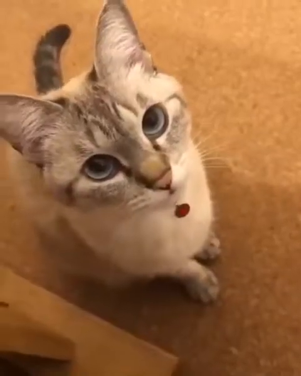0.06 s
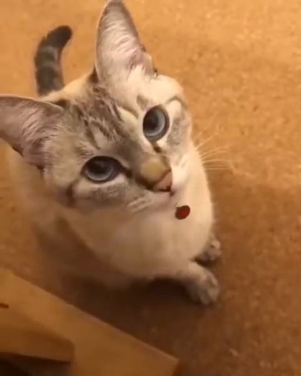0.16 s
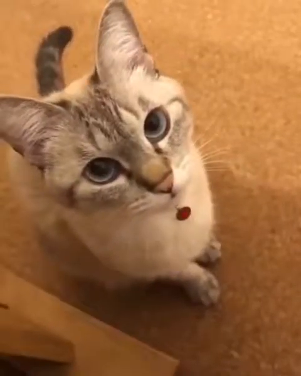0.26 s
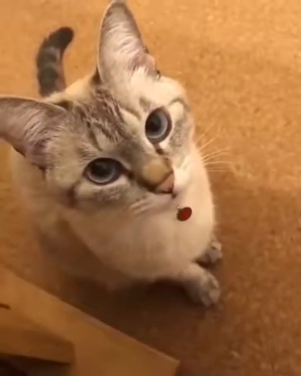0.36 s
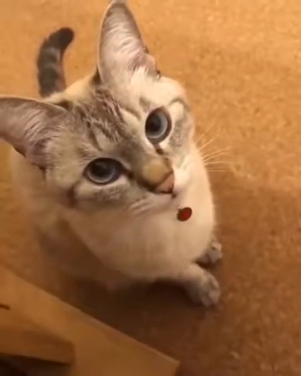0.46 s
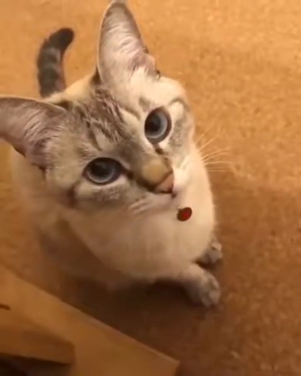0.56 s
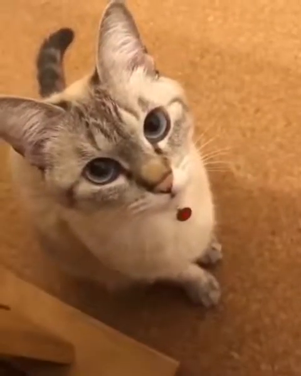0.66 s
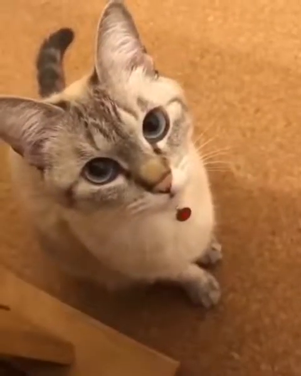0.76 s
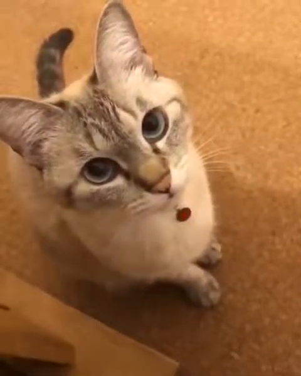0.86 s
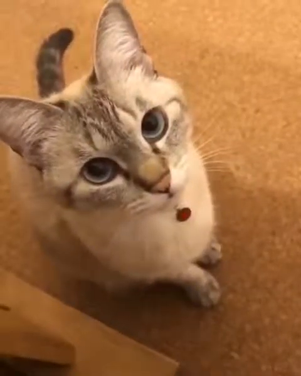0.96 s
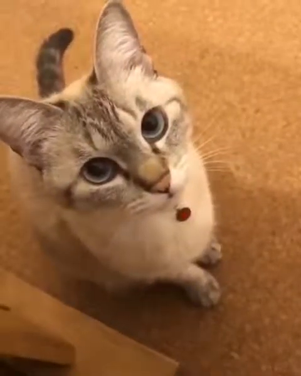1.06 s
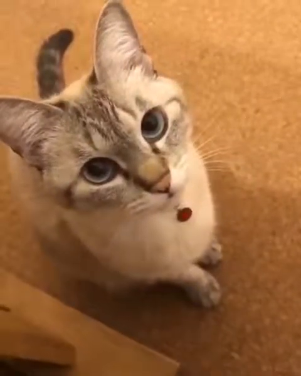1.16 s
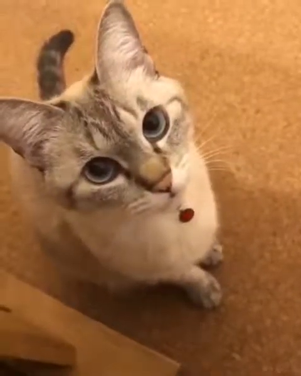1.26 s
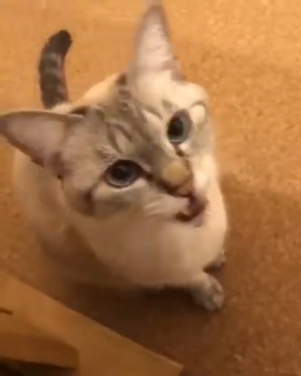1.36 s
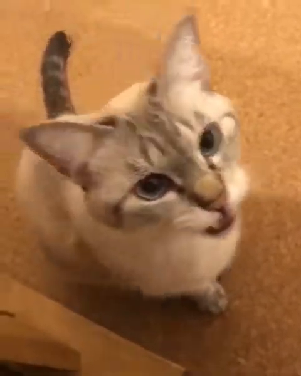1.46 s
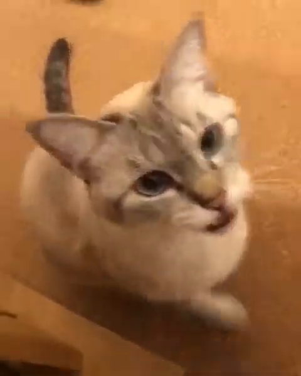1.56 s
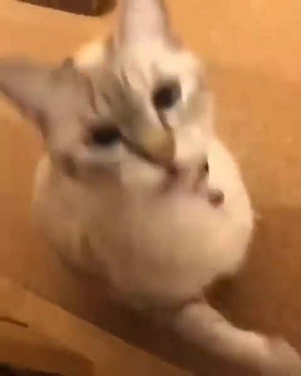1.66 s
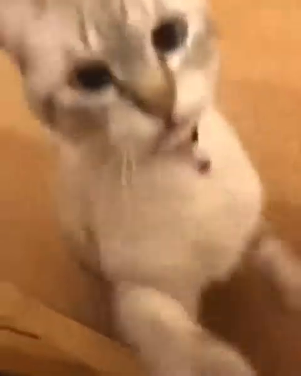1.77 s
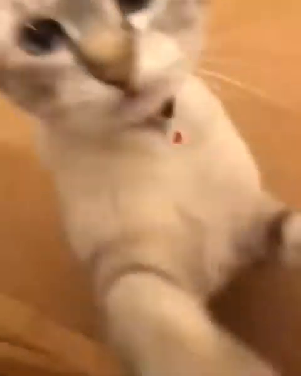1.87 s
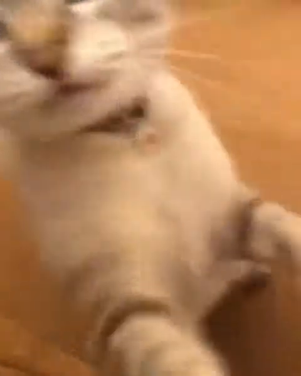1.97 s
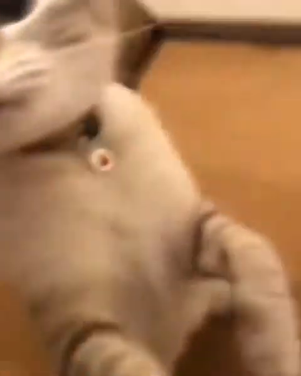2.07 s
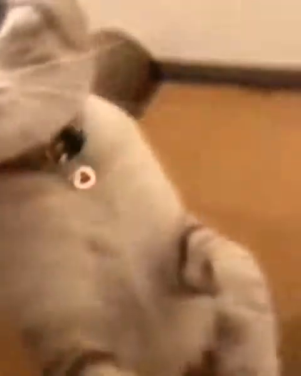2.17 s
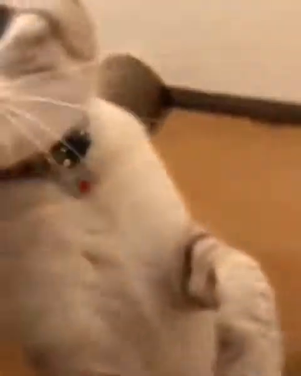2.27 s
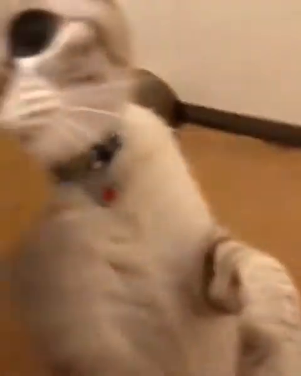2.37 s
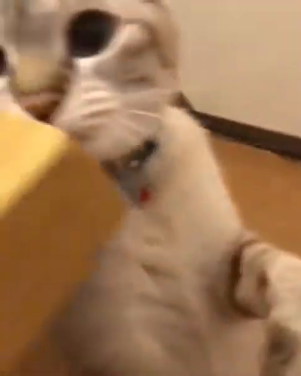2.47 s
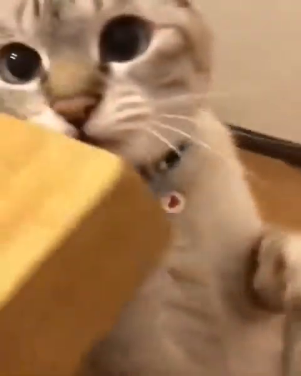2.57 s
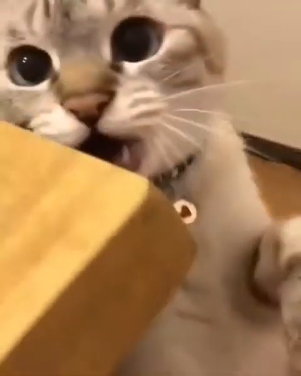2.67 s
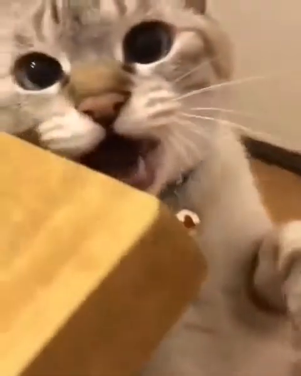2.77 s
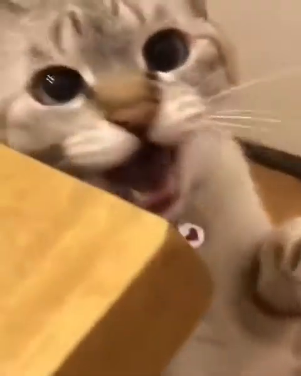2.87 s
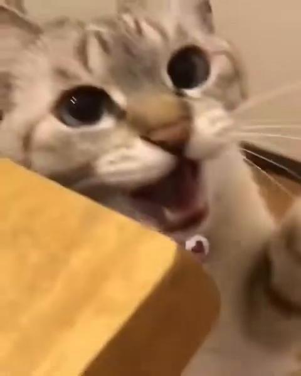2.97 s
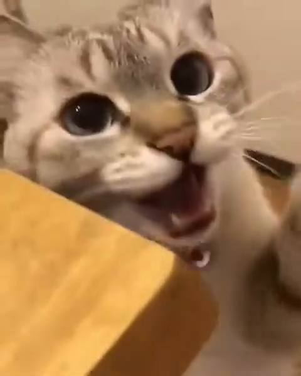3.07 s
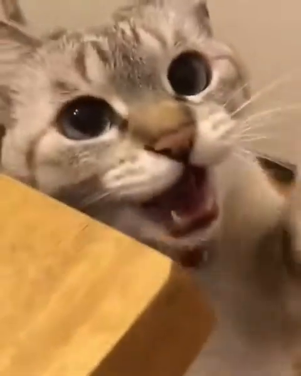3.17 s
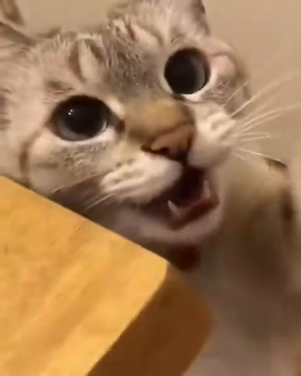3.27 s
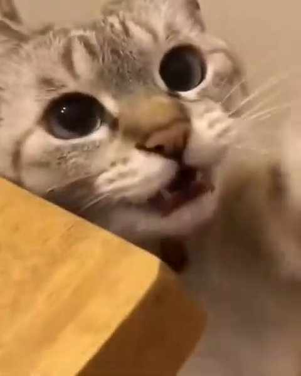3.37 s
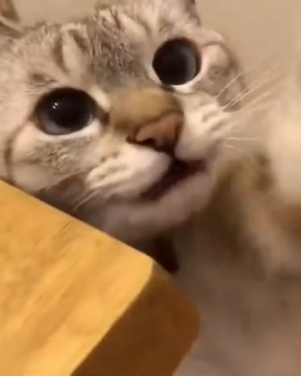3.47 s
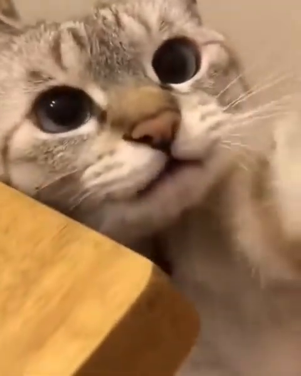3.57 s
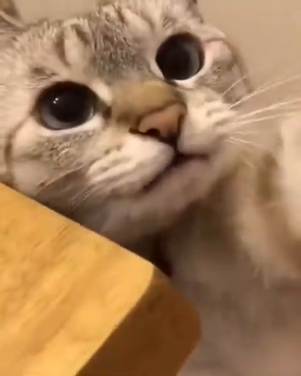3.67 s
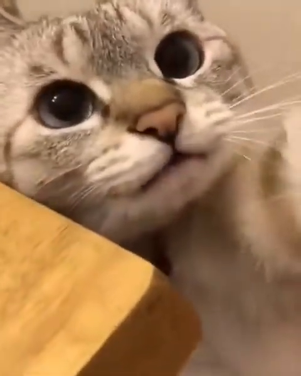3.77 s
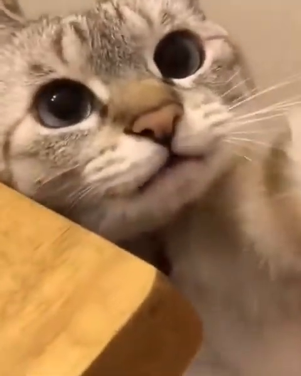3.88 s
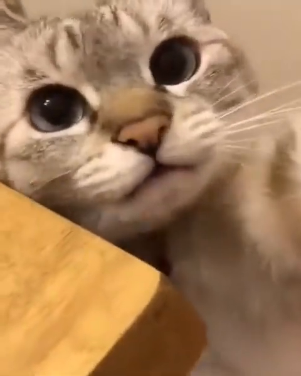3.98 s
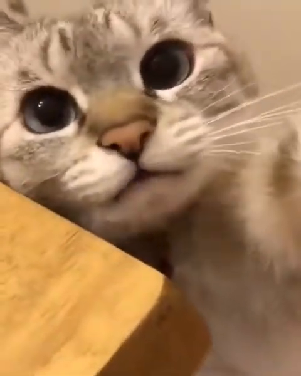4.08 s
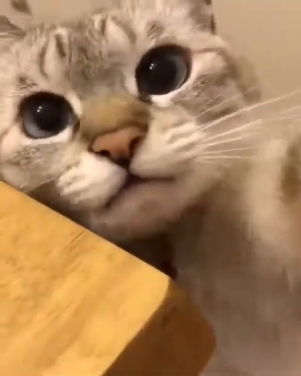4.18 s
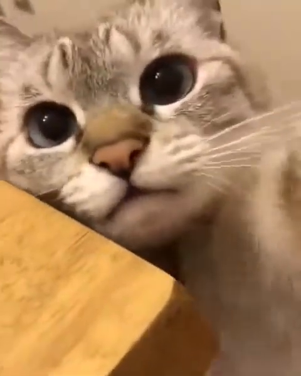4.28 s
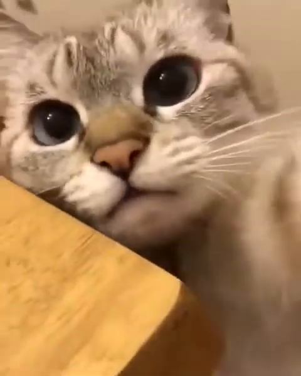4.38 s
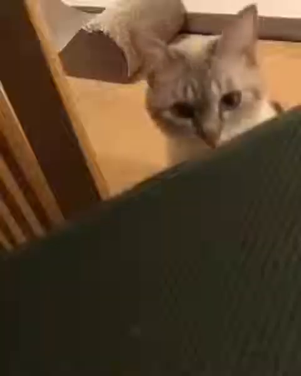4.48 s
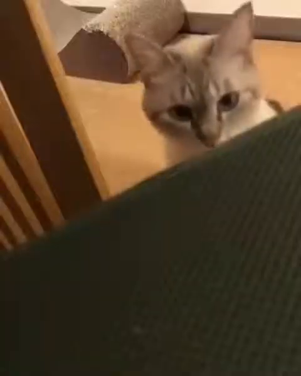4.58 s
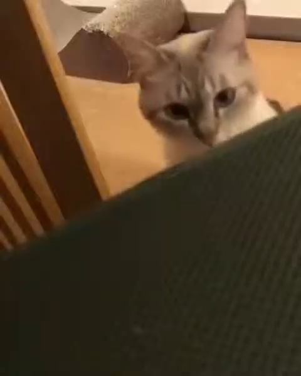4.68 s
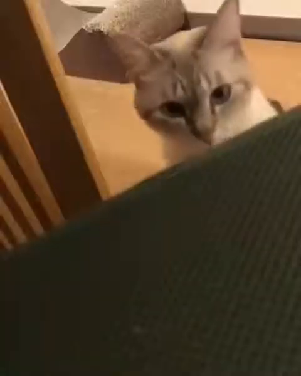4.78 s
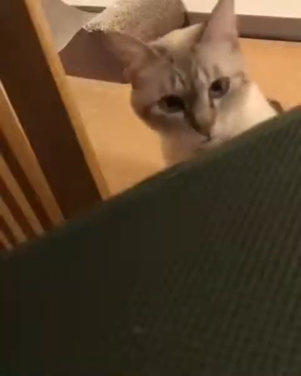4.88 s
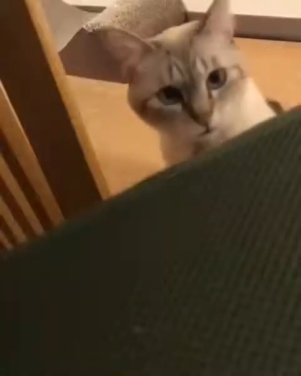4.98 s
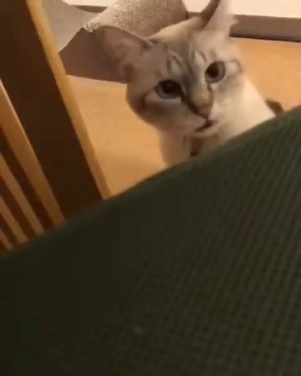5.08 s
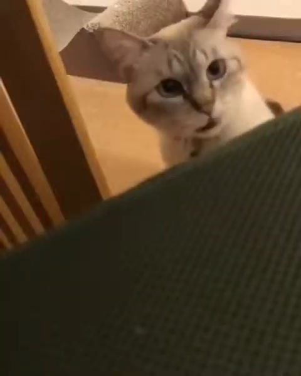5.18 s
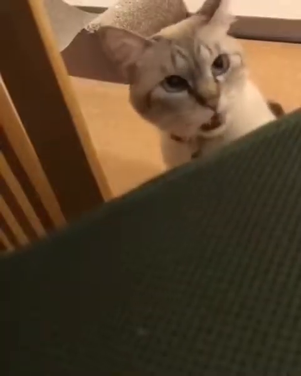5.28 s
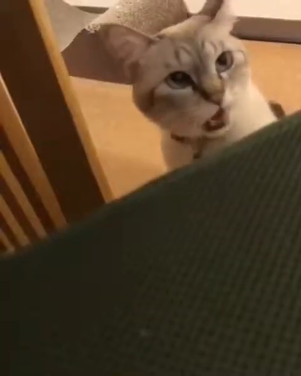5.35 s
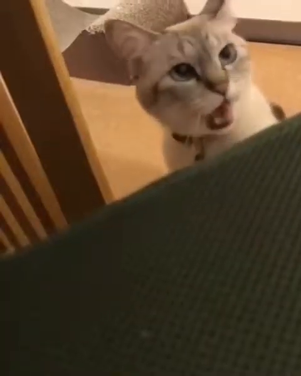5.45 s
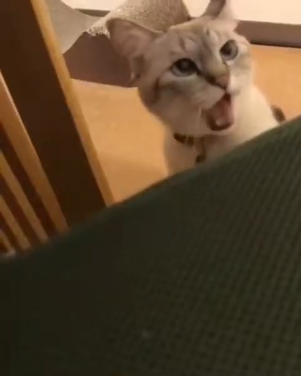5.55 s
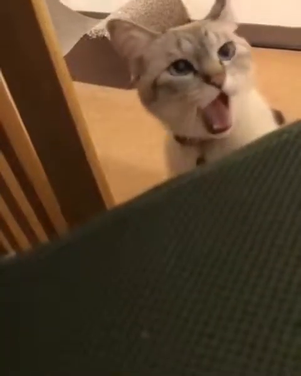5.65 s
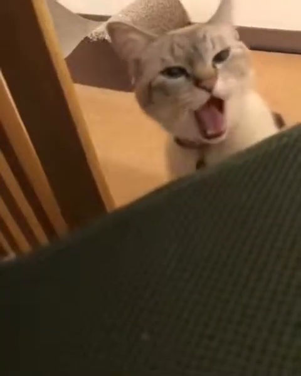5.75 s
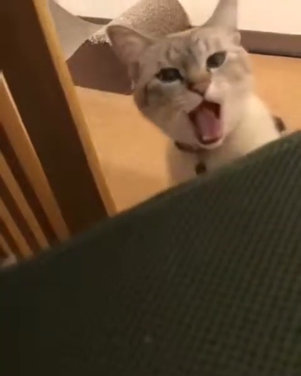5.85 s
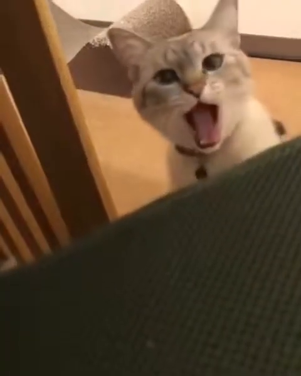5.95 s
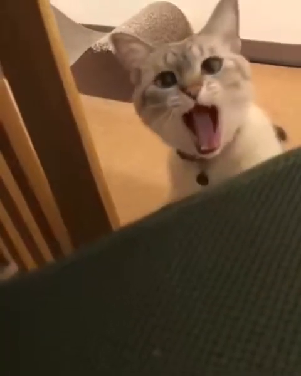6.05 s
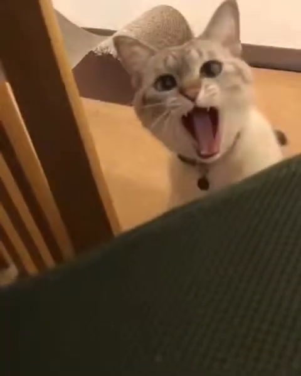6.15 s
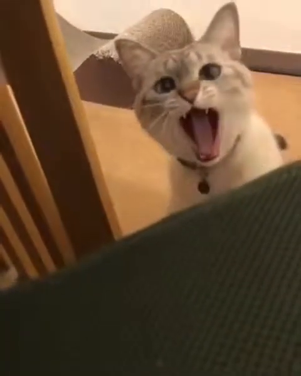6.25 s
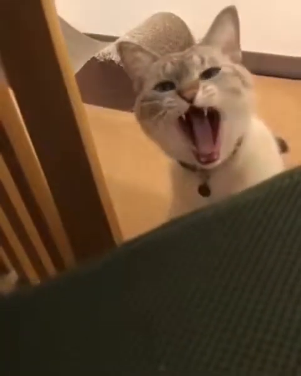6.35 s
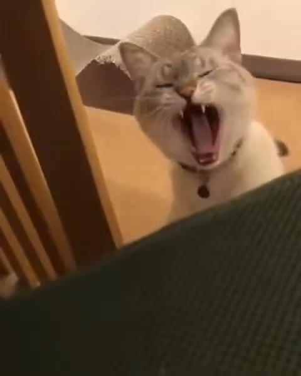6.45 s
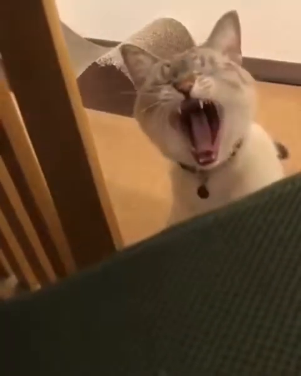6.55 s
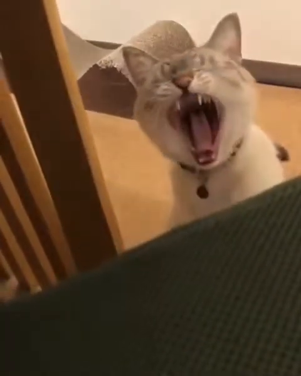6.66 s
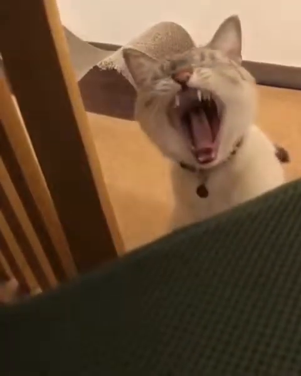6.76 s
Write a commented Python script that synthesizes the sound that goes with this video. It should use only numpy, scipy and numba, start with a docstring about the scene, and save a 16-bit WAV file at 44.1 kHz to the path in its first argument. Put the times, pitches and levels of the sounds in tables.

```python
"""An appliance rumbles in a carpeted room: coloured noise with a throbbing bass and two narrow drones.
A cat meows twice close by: pitched partials shaped by the mouth, with a rasp of air puffs. Between the calls
it rears up against a table: claws, paws and lips are short noise bursts, fur is patchy noise.
After a short silence a quieter room has a mains hum, a wavering sine under noise. The collar tag tinkles
once in two narrow bands, then the cat gives a long falling meow that widens into a yawn."""
import sys
import numpy as np
from scipy import signal
from scipy.fft import rfft, irfft
from scipy.io import wavfile
from scipy.ndimage import uniform_filter1d
from numba import njit

SR = 44100
rng = np.random.default_rng(int(sys.argv[2]) if len(sys.argv) > 2 else 0)


def to_wav(s):
    """Save 16-bit WAV."""
    ch = np.atleast_2d(s).T  # columns
    pcm = np.round(np.clip(ch, -1, 1) * 32767)  # PCM
    wavfile.write(sys.argv[1], SR, pcm.astype(np.int16))


def natural_amplitude(level_db):
    """Convert a level in decibels to a linear amplitude factor, elementwise."""
    exponent = np.asarray(level_db, float) / 20
    return 10 ** exponent


N = 300762  # samples


def curve(table):
    """Columns of a (seconds, ..) table, drawn as straight lines with one value a sample."""
    seconds, *columns = np.transpose(table)
    return [np.interp(np.arange(N) / SR, seconds, column) for column in columns]


def level(x, db):
    """Scale to an rms level in dB."""
    return x * natural_amplitude(db) / np.sqrt(np.mean(x ** 2))


@njit
def svf(x, hz, width):
    """State-variable band-pass with a moving centre, gain 1 there."""
    y, b, l = np.empty(len(x)), 0., 0.
    for i in range(len(x)):
        g, k = np.tan(np.pi * hz[i] / SR), width / hz[i]
        v = (b + g * (x[i] - l)) / (1 + g * (g + k))
        b, l, y[i] = 2 * v - b, l + 2 * g * v, k * v
    return y


def band(x, hz, width):
    """Band-pass at a fixed or moving centre."""
    return svf(x, hz + np.zeros(len(x)), 1. * width)


def steep(x, hz, width):
    """The band-pass twice, for dark valleys either side."""
    return band(band(x, hz, width), hz, width)


def walk(rate):
    """Random levels held 1 / rate seconds and slewed twice; spread near 1."""
    hold = int(SR / rate)
    steps = np.repeat(rng.standard_normal(N // hold + 1), hold)
    return 1.3 * uniform_filter1d(uniform_filter1d(steps, hold), hold)[:N]


def spell(a, b):
    """One between two times, with soft edges."""
    t = np.arange(N) / SR
    return np.clip(np.minimum(t - a, b - t) / .012, 0, 1)


def room_noise(spectrum, drones, db, throb_db):
    """Coloured noise whose bass throbs, with narrow drones on top."""
    hz, colour_db = np.transpose(spectrum)
    f = np.arange(N // 2 + 1) * SR / N
    colour = natural_amplitude(np.interp(np.log(f + 1), np.log(hz), colour_db))
    noise = rfft(rng.standard_normal(N)) * colour
    bass = irfft(noise * (f < 150), N)
    throbbing = irfft(noise, N) + bass * (natural_amplitude(throb_db * walk(8.0)) - 1)
    tones = sum(level(steep(rng.standard_normal(N), c, w), d) for c, w, d in drones)
    return level(throbbing, db) + tones


# Carpeted room with a rumbling appliance. First part, each row: frequency in Hz, relative density in dB per Hz.
# Second part, each drone: centre in Hz, width of each filter pass in Hz, rms in dB. Last: rms of the noise in dB.
APPLIANCE_ROOM = [(15, -46.5), (25, -28), (64, 0.5), (81, -5), (108, -11.5), (156, -19.5), (270, -15),
                  (325, -19), (400, -16), (445, -17.5), (578, -25.5), (13000, -52.5)], [(273, 14, -74.5),
                  (404.4, 16, -74)], -60


def appliance_room():
    """The rumble throbs strongly in the bass and fades out fast before the silence."""
    t = np.arange(N) / SR
    return np.clip((4.508 - t) / 0.009, 0, 1) * room_noise(*APPLIANCE_ROOM, throb_db=5.0)


# Vocal folds, one table a call. Each row: time in seconds, pitch in Hz, rms of the fundamental in dB.
FOLDS = [
    [(1.442, 560, -59), (1.454, 530, -44.5), (1.478, 544, -43.5), (1.502, 477, -40), (1.53, 502, -43),
     (1.554, 453, -43.5), (1.59, 448, -46.5), (1.618, 454, -48.5), (1.634, 481.5, -47), (1.714, 473, -45.5),
     (1.754, 488.7, -45), (1.806, 474, -48), (1.826, 484.3, -46), (1.858, 479, -49.5), (1.882, 532, -60.5),
     (1.918, 500, -37.5), (1.934, 574, -43.5), (1.974, 505, -46), (1.998, 500, -71)],
    [(2.7, 460, -52), (2.714, 505, -47), (2.754, 511, -43.5), (2.794, 536, -41.5), (2.822, 538, -41.5),
     (2.838, 486, -41.5), (2.89, 543, -41), (2.91, 545, -51), (2.934, 509, -45), (3.01, 517.3, -45.5),
     (3.118, 521, -43.5), (3.218, 514.6, -45), (3.354, 497.5, -46.5), (3.534, 481.4, -46.5),
     (3.614, 475.4, -47.5), (3.655, 485, -47), (3.714, 597, -46), (3.73, 567, -50.5), (3.742, 570, -65)],
    [(5.356, 500, -49.5), (5.368, 458.6, -50.5), (5.416, 456.7, -48), (5.432, 435, -47.5), (5.5, 429, -55),
     (5.518, 440.2, -56.5), (5.652, 443, -52.5), (5.72, 452.8, -50.5), (5.83, 458.3, -50.5),
     (6.0, 449.5, -49.5), (6.148, 440.2, -50), (6.272, 413, -47), (6.328, 403, -45), (6.352, 395.4, -47.5),
     (6.48, 381, -52), (6.62, 342, -49), (6.655, 377, -57.5), (6.704, 297, -54), (6.72, 260, -67),
     (6.748, 265, -67.5)],
]


def fold_pitch(call):
    """Pitch and effort of the folds; the long call quavers as the breath runs out."""
    hz, first_db = curve(FOLDS[call])
    t = np.arange(N) / SR
    quaver = spell(6.5, 6.625) * np.cos(2 * np.pi * 33 * (t - 6.572))  # 33 a second
    return hz + 8 * quaver, first_db + 1.5 * quaver


# The folds lose step. Each row: start in seconds, end in seconds, added scatter of the pitch as a share.
CREAKS = [(1.524, 1.551, .04), (1.547, 1.619, .01), (1.868, 1.904, .07), (2.8, 2.85, 0.04),
          (6.61, 6.737, 0.04)]


def fold_phase(hz):
    """Running count of fold cycles, slightly uneven throughout and more so in the creaks."""
    t = np.arange(N) / SR
    scatter = 0.0043 + sum(share * ((t > a) & (t < b)) for a, b, share in CREAKS)
    return np.cumsum(hz * (1 + uniform_filter1d(scatter, size=200) * walk(400))) / SR


# Mouth, one table a call. Each row: time in seconds, rms of the 2nd partial in dB, opening from 0 to 1,
# mouth resonance in Hz, its peak in dB.
MOUTH = [
    [(1.442, -66.5, 0.5, 3120, -100), (1.498, -46.5, 0.03, 3030, -65), (1.526, -52, .1, 2620, -91),
     (1.554, -44, .8, 2380, -49.5), (1.59, -38.5, 0.9, 2210, -37.5), (1.618, -43, 0.76, 2480, -47),
     (1.67, -44.5, .95, 2720, -48), (1.718, -42.5, 0.62, 2710, -39.5), (1.746, -42, 0.82, 2740, -48),
     (1.858, -47, 0.84, 2470, -55), (1.886, -54.5, .4, 2680, -70), (1.914, -43, .15, 2300, -65),
     (1.946, -52.5, 0.4, 2700, -83), (1.998, -78, 0.2, 3180, -83)],
    [(2.698, -65, 0.3, 3067, -84), (2.782, -59, 0.14, 3048, -69.5), (2.838, -40.5, 0, 2976, -81),
     (2.866, -40, .02, 2967, -68), (2.906, -44, 0.2, 2850, -60), (2.918, -38, 0.86, 2990, -56),
     (3.018, -40, 0.99, 3092, -69), (3.12, -38, 0.99, 2660, -48), (3.218, -37.5, 0.93, 2570, -45),
     (3.36, -38, 0.93, 2480, -48), (3.53, -40, 0.74, 2390, -47.5), (3.6, -42, .8, 2385, -50),
     (3.646, -42.5, .6, 2380, -50), (3.685, -44.5, 0.75, 2600, -78), (3.742, -69, 0.6, 3123, -100)],
    [(5.356, -64.5, 0.27, 2780, -79), (5.388, -59, .2, 2736, -74.5), (5.436, -55.5, 0.5, 2300, -87),
     (5.524, -49, 0.87, 3100, -66), (5.704, -51, 1, 3120, -53), (5.836, -49, 0.95, 3250, -58),
     (6.012, -50.5, 1, 3070, -53.5), (6.124, -47.5, 0.98, 3040, -60), (6.248, -50, 0.75, 2770, -69.5),
     (6.456, -62, 0.43, 2670, -90), (6.59, -70, 0.55, 2400, -90), (6.65, -79.5, 0.47, 2398, -100),
     (6.748, -91, .2, 2000, -100)],
]
# Against the 2nd partial, mouth shut: 4th partial in dB, shoulders in dB, rasp in dB.
SHUT_DB = -27.5, -39.5, -25.5
# The same with the mouth wide open, one row a call: 4th partial in dB, shoulders in dB, rasp in dB.
WIDE_DB = [(-19, -12.5, -10), (-2.5, -14.5, -16), (-13, -13.5, -19)]


def mouth_shape(call):
    """The wider the mouth, the more of the upper sound gets out; the yawn lifts the 4th partial."""
    second_db, opening, mouth_hz, peak_db = curve(MOUTH[call])
    opening = np.clip(opening, 0, 1)
    fourth_db, shoulder_db, rasp_db = (
        second_db + shut + opening * (wide - shut) for shut, wide in zip(SHUT_DB, WIDE_DB[call]))
    t = np.arange(N) / SR
    # the jaw stretches on a slope of 22 dB in 0.86 s, which the call's end cuts short
    fourth_db = fourth_db + 22 * np.clip((t - 6.02) / (6.88 - 6.02), 0, 1)
    return second_db, opening, mouth_hz, peak_db, fourth_db, shoulder_db, rasp_db


# Tract, one row a call: mouth resonance width in Hz, shoulder edge in Hz, throat ring at the start in Hz,
# ring once open in Hz, ring width in Hz, flutter in dB (before its weight for each partial),
# phase step between partials in radians.
TRACT = [(700, 4000, 4450, 5070, 1160, 1.4, 1.4), (750, 4170, 4600, 5300, 670, 1.8, 2.6),
         (700, 3180, 4100, 5640, 1240, 1.76, 1.23)]


def throat_ring_hz(call):
    """The throat ring glides from its starting pitch towards its open one."""
    _, _, shut_hz, open_hz, _, _, _ = TRACT[call]
    since = np.maximum(np.arange(N) / SR - FOLDS[call][0][0], 0)
    return open_hz + (shut_hz - open_hz) * np.exp(-since / 0.27)


# Third partial, one table a call. Each row: time in seconds, rms in dB.
THIRD = [
    [(1.442, -90), (1.474, -69), (1.526, -75), (1.554, -52), (1.59, -57), (1.67, -45), (1.826, -45),
     (1.858, -52), (1.886, -66), (1.998, -84)],
    [(2.698, -76), (2.818, -73), (2.838, -56), (2.88, -69), (2.906, -65), (2.915, -47.5), (3.018, -45.5),
     (3.12, -40), (3.33, -44.5), (3.53, -47), (3.646, -52.5), (3.69, -46), (3.742, -69)],
    [(5.356, -63.5), (5.416, -74), (5.48, -63), (5.6, -56.5), (5.876, -56.5), (5.972, -57), (6.06, -54.5),
     (6.248, -55), (6.456, -62.5), (6.588, -64), (6.648, -73), (6.748, -92)],
]
# Throat ring, one table a call. Each row: time in seconds, peak in dB.
RING = [
    [(1.52, -104), (1.6, -67), (1.67, -84), (1.718, -54), (1.75, -68), (1.83, -62), (1.95, -100)],
    [(2.78, -110), (2.93, -68), (3.04, -63), (3.218, -102), (3.36, -72), (3.42, -63), (3.62, -63.5),
     (3.7, -100)],
    [(5.39, -86), (5.5, -79), (5.6, -74), (5.72, -65.5), (5.88, -64.5), (5.97, -69.5), (6.03, -65),
     (6.25, -78.5), (6.456, -104)],
]
# Strong and weak pulses alternate. Each row: start in seconds, end in seconds, depth from 0 to 1.
DOUBLING = [(1.55, 1.625, .25), (1.87, 1.93, .4), (5.96, 6.027, 0.08)]


def partials(call, hz, first_db, phase, shape, ring_hz):
    """Sixteen harmonics of the folds, weighted by mouth, shoulders and throat ring."""
    second_db, _, mouth_hz, peak_db, fourth_db, shoulder_db, _ = shape
    mouth_width, shoulder_hz, _, _, ring_width, flutter_db, phase_step = TRACT[call]
    (third_db,), (ring_db,) = curve(THIRD[call]), curve(RING[call])
    # the mouth resonance has a wider skirt, 1300 Hz, at the 4th partial
    fourth = natural_amplitude(fourth_db) + natural_amplitude(peak_db) / (1 + (2 * (4 * hz - mouth_hz) / 1300) ** 4)
    # alternating pulses split the upper partials
    depth = sum(share * spell(a, b) for a, b, share in DOUBLING)
    uneven = 1 + depth * np.cos(np.pi * phase)
    out = natural_amplitude(first_db) * np.cos(2 * np.pi * phase)
    for k in range(2, 17):
        f = k * hz
        peak = natural_amplitude(peak_db) / (1 + (2 * (f - mouth_hz) / mouth_width) ** 4)
        shoulders = natural_amplitude(shoulder_db) / (1 + (f / shoulder_hz) ** 10)
        ring = natural_amplitude(ring_db) / (1 + (2 * (f - ring_hz) / ring_width) ** 4)
        gain = {2: natural_amplitude(second_db), 3: natural_amplitude(third_db), 4: fourth}.get(k, peak + shoulders + ring)
        # small moves of tongue and head make each partial flutter on its own, the high ones most
        flutter = min(.35 * (k - 1), 2.2) * (.9 * walk(22) + .35 * walk(7))
        gain = gain * natural_amplitude(flutter_db * flutter)
        if k > 4:
            gain = gain * uneven
        out += gain * np.cos(2 * np.pi * k * phase + phase_step * (k - 2))
    return np.sqrt(2) * out  # makes the partial levels rms


# Hoarser and clearer spells. Each row: start in seconds, end in seconds, change of the rasp in dB
# (the high rasp takes 0.96 of it).
HOARSE = [(1.53, 1.6, 2), (1.87, 1.922, 11), (3.033, 3.191, -5.5), (3.205, 3.249, 2), (3.331, 3.379, 0.5),
          (3.676, 3.713, 1), (5.82, 5.86, 11), (5.95, 6.04, 10), (6.07, 6.45, -6)]
# Strength beside the rasp in the mouth resonance, one row a call: low rasp as a share, high rasp as a share.
RASP_SHARES = [(0.62, 0.43), (.1, 0.49), (0.51, 0.61)]


def breath_rasp(call, hz, phase, mouth_hz, ring_hz, rasp_db):
    """Air puffs once a fold cycle, heard low, in the mouth resonance and in the throat ring."""
    low_share, high_share = RASP_SHARES[call]
    hoarse_db = sum(db * spell(a, b) for a, b, db in HOARSE)
    puffs = .6 + np.cos(np.pi * phase) ** 2
    air = rng.standard_normal(N) * puffs * natural_amplitude(1.5 * walk(45))
    body = band(steep(air, mouth_hz, 1500), mouth_hz, 1500) + low_share * steep(air, 4.5 * hz, 700)
    high = high_share * level(steep(air, ring_hz, 2200), 0)
    rasp = level(body, 0) * natural_amplitude(hoarse_db) + high * natural_amplitude(0.96 * hoarse_db)
    return air, rasp * natural_amplitude(rasp_db)


def teeth_hiss(air, second_db, opening):
    """The thin hiss at the teeth follows the steady effort of the open mouth."""
    hiss = steep(air, 7000, 1600) + 3.0 * steep(air, 10300, 1600) + 1.8 * steep(air, 11000, 1800)
    return level(hiss, -35) * natural_amplitude(second_db) * opening ** 3


def meow(call):
    """One call: fold partials, rasp and hiss, let through between its first and last moment."""
    hz, first_db = fold_pitch(call)
    phase = fold_phase(hz)
    shape = mouth_shape(call)
    second_db, opening, mouth_hz, _, _, _, rasp_db = shape
    ring_hz = throat_ring_hz(call)
    tone = partials(call, hz, first_db, phase, shape, ring_hz)
    air, rasp = breath_rasp(call, hz, phase, mouth_hz, ring_hz, rasp_db)
    hiss = teeth_hiss(air, second_db, opening)
    t = np.arange(N) / SR
    gate = np.clip(np.minimum(t - FOLDS[call][0][0], FOLDS[call][-1][0] - t) / 0.0046, 0, 1)
    return gate * (tone + rasp + hiss)


# Fur and paws on the move. Each row: time in seconds, dull shuffle in dB, bright swish in dB.
RUSTLE = [(1.5, -83.5, -102), (1.57, -71, -66), (1.68, -71, -81), (1.85, -68, -64.5), (1.96, -78, -81.5),
          (2.15, -74, -82.5), (2.33, -79, -86.5), (2.6, -71, -99), (2.95, -70, -99)]


def rustle():
    """Patchy friction noise: a dull shuffle on the carpet and a grainy swish of fur."""
    shuffle_db, swish_db = curve(RUSTLE)
    t = np.arange(N) / SR
    moving = (t > RUSTLE[0][0]) & (t < RUSTLE[-1][0])
    shuffle = steep(rng.standard_normal(N), 1300, 2200) * natural_amplitude(2.2 * walk(60))
    grain = natural_amplitude(2.5 * walk(250) + 2.1 * walk(30))
    swish = steep(rng.standard_normal(N), 10000, 8300) * grain
    return moving * (level(shuffle, 0) * natural_amplitude(shuffle_db) + level(swish, 0) * natural_amplitude(swish_db))


def clicks(table):
    """Each a short noise burst whose treble comes first and whose body follows lower."""
    out, t = np.zeros(N), np.arange(2048) / SR
    for s, db, hz, width, ring_ms in table:
        decay = 1000. ** (-t / (ring_ms / 1000))  # falls 60 dB in the ring time
        blow = rng.standard_normal(len(t)) * (1 - np.exp(-t / 0.0012)) * decay
        # broad bursts sink in pitch, narrow rings hold
        centre = np.minimum(hz + 0.5 * width * np.exp(-t / 0.00046), SR / 3)
        burst = steep(blow, centre, width)
        i = int((s - .001) * SR)
        out[i:i + len(t)] += natural_amplitude(db) * burst / np.abs(burst).max()
    return out


# Claws and collar. Each row: time in seconds, peak in dB, settled centre in Hz, width of each filter pass in Hz,
# ring in ms.
TICKS = [(1.929, -54, 4280, 1210, 7.1), (2.022, -56.5, 7000, 6100, 4), (2.035, -41.5, 2670, 6000, 8.8),
         (2.060, -48, 1775, 2200, 8.8), (2.081, -53.5, 7000, 8000, 8.7), (2.087, -47.5, 2300, 1500, 8.9),
         (2.120, -58.5, 8000, 7000, 47), (2.222, -57, 3460, 6000, 17), (2.253, -59, 6950, 8000, 12),
         (2.266, -58, 7760, 9000, 54), (2.296, -57.5, 8500, 6000, 21)]


def claw_ticks():
    """Bright ticks, each with a softer body from the wood under the claw."""
    wood = [(s, db - 8.5, 970, 1100, ring_ms) for s, db, _, _, ring_ms in TICKS]
    return clicks(TICKS + wood)


# Paws on wood and carpet. Each row: time in seconds, peak in dB, settled centre in Hz,
# width of each filter pass in Hz, ring in ms.
THUDS = [(2.155, -54, 500, 600, 27), (2.180, -49.5, 238, 304, 62), (2.828, -45, 260, 250, 25),
         (3.77, -45, 376, 500, 8.4), (2.541, -55, 900, 900, 12), (6.279, -43, 442, 700, 12)]


def paw_thuds():
    """Soft paws land as low, dull bursts."""
    return clicks(THUDS)


# Lips parting and closing, and last a soft throat onset. Each row: time in seconds, peak in dB, settled centre
# in Hz, # width of each filter pass in Hz, ring in ms.
SMACKS = [(2.838, -42, 1800, 2200, 9.4), (2.910, -33.5, 1770, 3500, 6.4), (3.767, -41, 1160, 1300, 8.7),
          (5.356, -56, 1520, 500, 20)]


def mouth_clicks():
    """Lips click in the middle of the spectrum; a soft throat click opens the long call."""
    return clicks(SMACKS)


# Quieter room. First part, each row: frequency in Hz, relative density in dB per Hz.
# Second part: drones, none here. Last: rms of the noise in dB.
HUM_ROOM = [(15, -57), (25, -11.5), (48, -12), (103, -9), (152, -9.5), (257, -6.5), (1030, -25.5),
            (11400, -38), (13000, -43)], [], -70.5


def hum_room():
    """A mains hum of wavering level over gentle noise, coming in abruptly after the silence."""
    t = np.arange(N) / SR
    hum = level(np.sin(2 * np.pi * 100.6 * t) * natural_amplitude(1.3 * walk(12)), -69)
    return np.clip((t - 4.652) / 0.0013, 0, 1) * (hum + room_noise(*HUM_ROOM, throb_db=1.0))


def collar_tag():
    """The tag tinkles once: two narrow metal modes struck together."""
    return clicks([(5.196, -64.5, 2900, 180, 24), (5.196, -69.5, 5300, 180, 24)])


def add_echo(cat):
    """A short dull echo: band-passed noise falling 60 dB in 0.16 s, 22 dB down in energy."""
    tail = np.arange(SR // 3) / SR
    echo = band(rng.standard_normal(len(tail)), 1100, 3500)
    echo = echo * 1000. ** (-tail / .16) * (tail > .003)
    echo = echo / np.sqrt(np.sum(echo ** 2))
    return cat + natural_amplitude(-22) * signal.fftconvolve(cat, echo)[:N]


def scene():
    """The cat with its echo, over one room and then the other."""
    calls = sum(meow(call) for call in range(len(FOLDS)))
    small_sounds = rustle() + claw_ticks() + paw_thuds() + mouth_clicks() + collar_tag()
    cat = add_echo(calls + small_sounds)
    return (cat + appliance_room() + hum_room())[None]


def low_pass(x):
    """Removes everything above the highest recorded frequency."""
    return signal.sosfilt(signal.butter(12, 13200, fs=SR, output="sos"), x)


def record(dry):
    """The finished mix as the phone keeps it."""
    return low_pass(dry)


dry = scene()
out = record(dry)
to_wav(out)
```